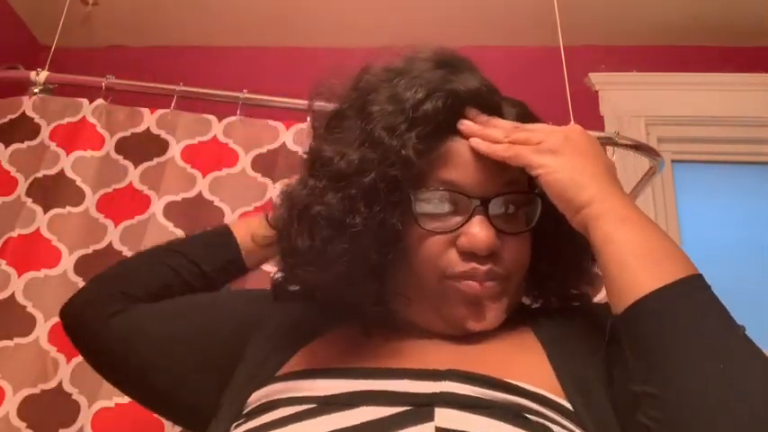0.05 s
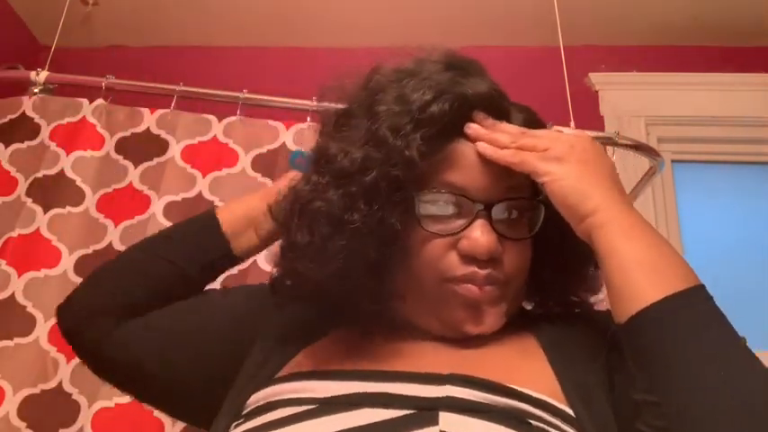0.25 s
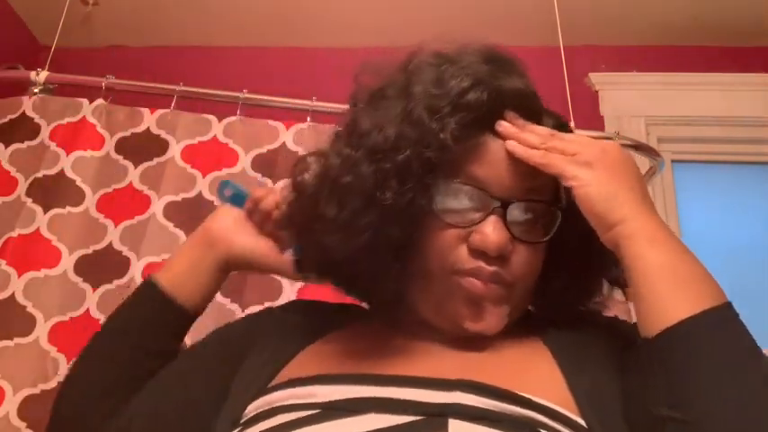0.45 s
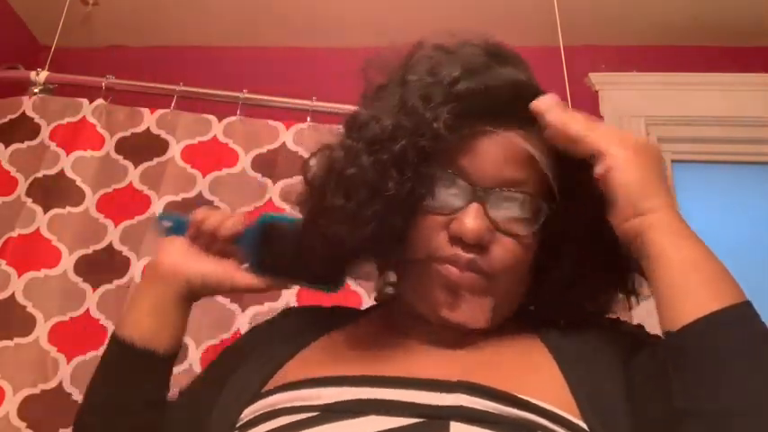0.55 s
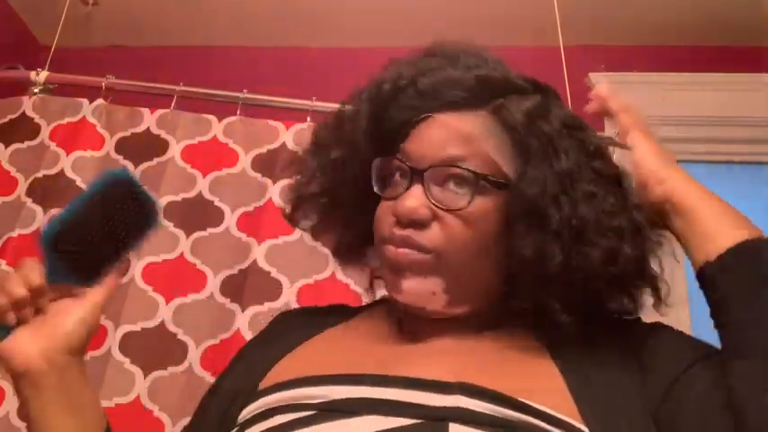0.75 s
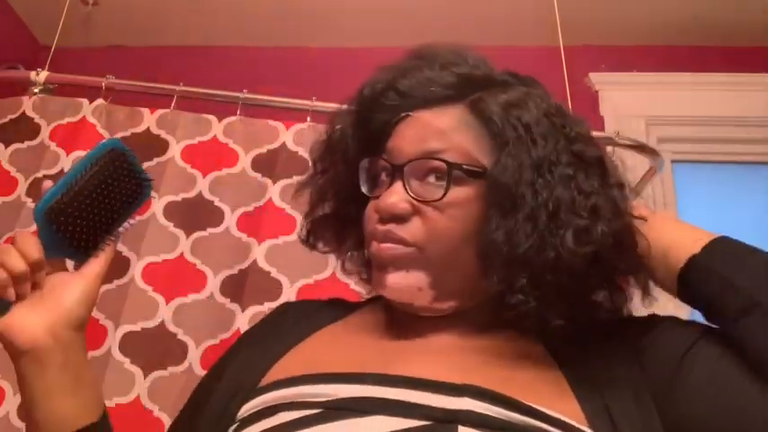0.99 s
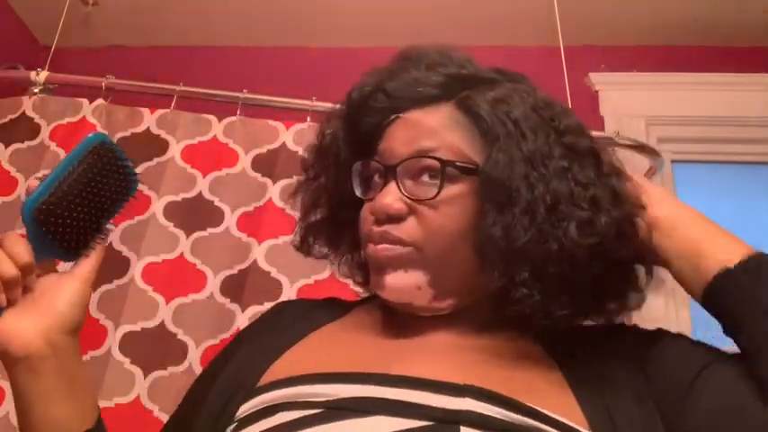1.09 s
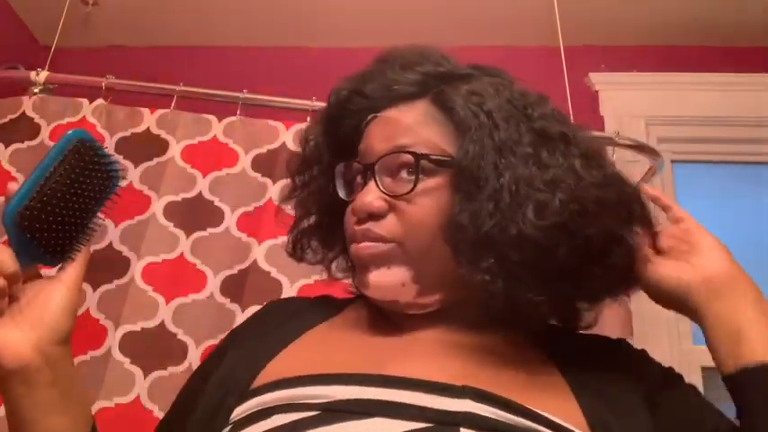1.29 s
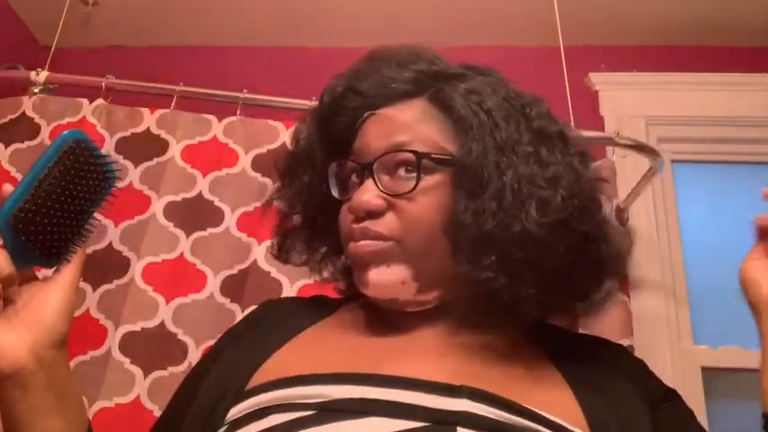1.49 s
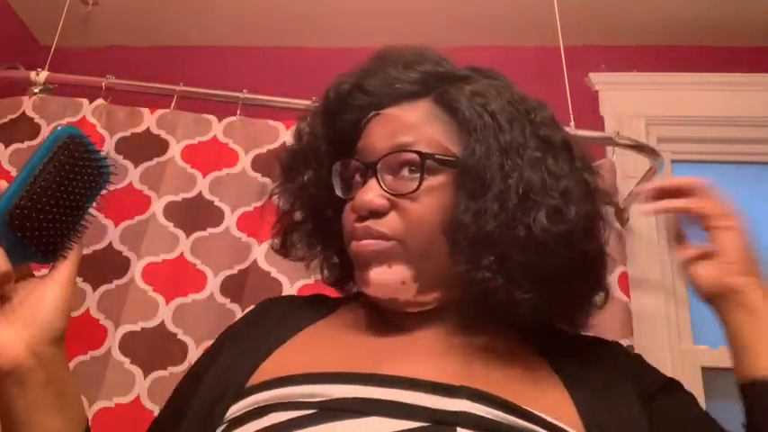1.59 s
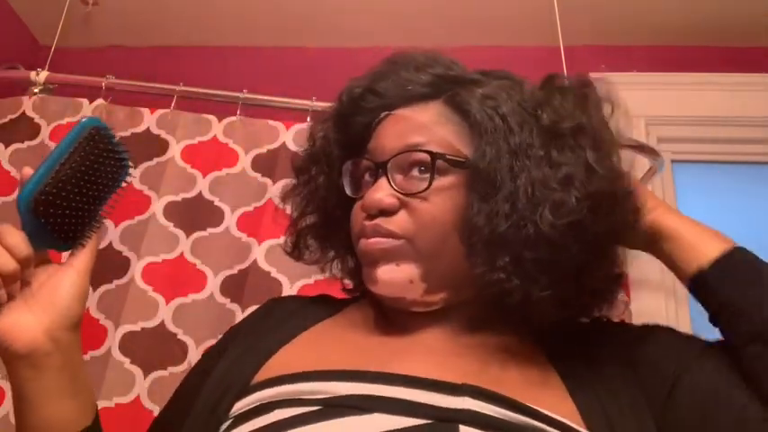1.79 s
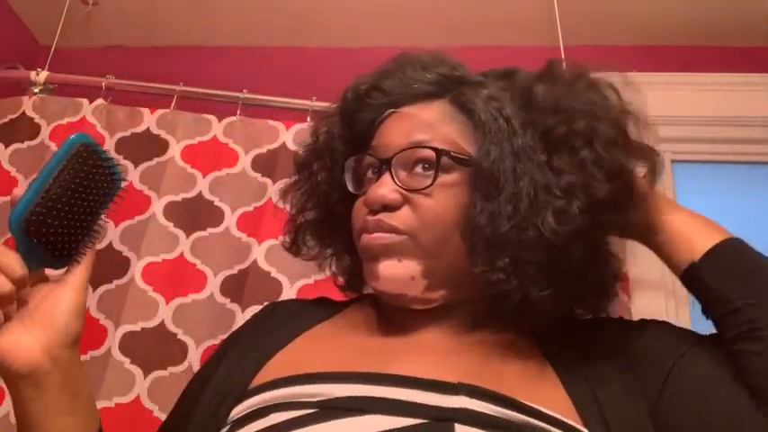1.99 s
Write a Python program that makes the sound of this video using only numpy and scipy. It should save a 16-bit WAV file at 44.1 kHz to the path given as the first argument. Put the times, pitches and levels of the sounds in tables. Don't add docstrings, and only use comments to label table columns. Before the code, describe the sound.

A paddle brush is pulled once through a curly wig, bristles scratching and its hollow cushion knocking, ending in a sharp click; then fingers faintly rustle the curls, close to a phone microphone in a small tiled bathroom.

```python
import sys
import numpy as np
from scipy import signal
from scipy.fft import rfft, irfft
from scipy.io import wavfile
from scipy.ndimage import uniform_filter1d

SR = 44100
rng = np.random.default_rng(int(sys.argv[2]) if len(sys.argv) > 2 else 0)


def dump_mix(stems):
    frames = np.atleast_2d(stems).T
    limited = np.clip(frames, -1, 1)
    pcm = np.round(limited * 32767).astype(np.int16)
    wavfile.write(sys.argv[1], SR, pcm)


def linear_from_db(decibels):
    return 10 ** (np.asarray(decibels, float) / 20)


N = 90404

# (time [s], cushion drag [dB], bristle scratch [dB], fibre slide [dB])
STROKE = [
    (0.11, -81.5, -91, -97),
    (0.18, -54, -61, -83),
    (0.286, -35, -41, -52),
    (0.36, -35.5, -38, -54.5),
    (0.386, -51, -46.5, -56),
    (0.5, -60, -67.5, -61.5),
    (0.564, -52.5, -67, -64),
    (0.604, -78, -91, -75.5),
    (0.66, -74, -94, -80),
]
# (time [s], level [dB])
TICKS = [
    (0.138, -58),
    (.167, -51),
    (0.2145, -46),
    (0.264, -43),
    (0.3531, -26.5),
]


def unit(x):
    return x / np.sqrt(np.mean(x ** 2))


def curve(rows, column):
    rows = np.array(rows)
    return np.interp(np.arange(N) / SR, rows[:, 0], rows[:, column])


def colour(x, points):
    hz = np.fft.rfftfreq(N, 1 / SR) + 1
    p = np.array(points)
    db = np.interp(np.log(hz), np.log(p[:, 0]), p[:, 1], left=-70, right=-70)
    return unit(irfft(rfft(x) * linear_from_db(db), N))


def ring(x, modes):
    out = 0
    for k, (hz, db, t60_s) in enumerate(modes):
        r = np.exp(-np.log(1000) / (t60_s * SR))
        w = 2 * np.pi * hz / SR
        mode = signal.lfilter([0, np.sin(w)], [1, -2 * r * np.cos(w), r * r], x)
        out = out + (-1) ** k * linear_from_db(db) * mode
    return out


def band(x, hz, width_hz):
    return unit(signal.lfilter(*signal.iirpeak(hz, hz / width_hz, SR), x))


def walk(rate_hz):
    k = int(SR / rate_hz)
    held = np.repeat(rng.standard_normal(N // k + 1), k)
    return unit(uniform_filter1d(uniform_filter1d(held, k), k)[:N])


def grains(rate_per_s, scatter_db):
    chance, sign, size = rng.random((N, 3)).T
    return unit((chance < rate_per_s / SR) * np.sign(sign - 0.5) * linear_from_db(-scatter_db * np.log(size + 1e-9)))


def hiss(points, rate_per_s, scatter_db, patchy_db):
    spec = rfft(colour(grains(rate_per_s, scatter_db), points))
    octave = np.log2(np.fft.rfftfreq(N, 1 / SR) + 1)
    out = 0
    for centre in np.arange(10, 14.6, 0.5):
        part = irfft(spec * np.clip(1 - 2 * abs(octave - centre), 0, 1), N)
        out = out + linear_from_db(patchy_db * walk(5.58)) * part
    return out


def house():
    # (frequency [Hz], density [dB per Hz])
    floor_spectrum = [(30, -17.5), (70, -4), (200, -12.5), (600, -20.5), (1050, -32), (7500, -43.5),
                      (14200, -48.5), (14900, -83)]
    # (frequency [Hz], width [Hz], level [dB])
    room_modes = [(99.4, 12.5, -72), (170.5, 25, -66), (341.4, 20, -78.5)]
    boom = 0
    for hz, width_hz, db in room_modes:
        mode = band(band(rng.standard_normal(N), hz, width_hz), hz, width_hz)
        boom = boom + linear_from_db(db + 1.56 * walk(5.8)) * mode
    return linear_from_db(-64.5 + 0.36 * walk(4.3)) * colour(rng.standard_normal(N), floor_spectrum) + boom


def hand():
    # (time [s], level [dB])
    finger_moves = [(0.78, -89), (0.984, -78.5), (0.998, -73.5), (1.206, -69), (1.266, -63), (1.368, -69.5),
                    (1.386, -72), (1.436, -97.5), (1.616, -95), (1.69, -71), (1.73, -69.5), (1.792, -85),
                    (1.806, -78), (1.866, -92), (1.934, -78), (1.97, -88), (2.04, -82), (2.05, -84)]
    # (frequency [Hz], density [dB per Hz])
    curl_spectrum = [(1060, -11), (1800, -14), (2160, -28), (2650, -7), (4550, -11), (4980, -4.5),
                     (7740, -1), (9270, -8), (15500, -4.5)]
    lock_slips = [(0.512, 0.048, -68, 12500, 4960), (1.008, .015, -81, 3100, 600),
                  (1.017, 0.038, -80, 9500, 1500), (.85, 0.013, -86, 13000, 3000),
                  (1.119, 0.013, -72.5, 4100, 2500), (1.21, 0.066, -76.5, 5040, 350),
                  (1.28, 0.033, -77, 7140, 1510), (1.35, 0.029, -73.5, 7300, 1200),
                  (1.715, 0.037, -74.5, 3200, 1700), (1.274, 0.047, -80.5, 3000, 900),
                  (1.93, .02, -84, 13600, 3000)]
    t = np.arange(N) / SR
    locks = 0
    for s, half_s, db, hz, width_hz in lock_slips:
        swell = np.exp(-0.5 * ((t - s) / half_s) ** 2)
        locks = locks + linear_from_db(db) * swell * band(grains(4000, 2.6), hz, width_hz)
    fade_in = np.clip((t - finger_moves[0][0]) / 0.052, 0, 1)
    level = fade_in * linear_from_db(curve(finger_moves, column=1) - 2.0)
    return level * hiss(curl_spectrum, 9000, 1.5, patchy_db=1.9) + locks


def fibres():
    # (frequency [Hz], density [dB per Hz])
    fibre_spectrum = [(1180, -42), (2000, -10), (2970, 0), (4550, -5.5), (6870, -2), (8290, -8),
                      (12000, -16.5), (15500, -13)]
    rush_db, rush_s, settle_db_per_s = -25.5, 0.017, 32
    t = np.arange(N) / SR
    rush = 0
    for s, db in TICKS:
        rush = rush + (t > s) * linear_from_db(db + rush_db) * np.exp(-np.maximum(t - s, 0) / rush_s)
    settling_db = settle_db_per_s * np.maximum(t - STROKE[-1][0], 0)
    slide = linear_from_db(curve(STROKE, column=3) - settling_db)
    return (slide + rush) * hiss(fibre_spectrum, 9000, 2.14, patchy_db=-0.86)


def ticks():
    # (frequency [Hz], level [dB], t60 [s])
    tip_modes = [(1410, 0, 0.004), (2870, -3.5, 0.0079), (4070, -12, 0.0027), (7900, -19, 0.0026),
                 (12400, -24, 0.0016)]
    x = np.zeros(N)
    for s, db in TICKS:
        x[int(s * SR)] = linear_from_db(db)
    return ring(x, tip_modes)


def brush():
    # (time [s], level [dB], brightness [0-1])
    snags = [(.139, -58, 0.14), (0.168, -42, 0.7), (.186, -39, 0.25), (.212, -38, 0.4),
             (0.241, -34.5, 0.77), (0.244, -33, 0.17), (.265, -32, 0.3), (.278, -34.5, .1),
             (.293, -26.5, 0.18), (0.306, -29, 0.34), (.328, -30.5, 0.17), (0.3527, -35, 0.86),
             (.559, -71, 0.2), (.936, -56.5, 0.12), (1.688, -66, .05)]
    # (frequency [Hz], level [dB], t60 [s])
    cushion_modes = [(202.7, -11, 0.11), (316, -9, 0.11), (372, -7.5, 0.078), (532.3, 0.5, 0.036),
                     (616.5, -3, 0.044), (669, -5.5, .08), (826, -7.5, 0.041), (899, -9, 0.053),
                     (961.7, -8, 0.055)]
    # (frequency [Hz], level [dB], t60 [s])
    bristle_modes = [(1200, -2, 0.021), (1486, -2.5, 0.015), (1710, -3, 0.013), (2440, -4, 0.0054),
                     (2940, -5, 0.0063), (3580, -7, .008), (4530, -6.5, 0.004), (5380, -11.5, 0.0066),
                     (6820, -12, 0.005)]
    snag_decay_s = 0.0048

    t = np.arange(N) / SR
    on = (t > STROKE[0][0]) * (t < STROKE[-1][0])
    drag = on * linear_from_db(curve(STROKE, column=1) + 0.5)
    scratch = on * linear_from_db(curve(STROKE, column=2) - 2)
    slips, scratches = grains(1500, 3), grains(6800, 3)
    low = ring(slips * drag, cushion_modes) / np.std(ring(slips, cushion_modes))
    high = ring(scratches * scratch, bristle_modes) / np.std(ring(scratches, bristle_modes))

    dull, bright = np.zeros(N), np.zeros(N)
    k = np.arange(int(0.015 * SR))
    for s, db, share in snags:
        burst = rng.standard_normal(len(k)) + 5.2 * (k < 4)
        burst = burst * np.exp(-k / (snag_decay_s * SR))
        burst = linear_from_db(db - 2.5) * burst / np.linalg.norm(burst)
        start = int(s * SR)
        dull[start:start + len(k)] += (1 - share) * burst
        bright[start:start + len(k)] += share * burst
    return low + high + ring(dull, cushion_modes) + ring(bright, bristle_modes[:3])


def tiled_room(near):
    t60_s, treble_t60_s = 0.28, 0.11
    t = np.arange(int(0.6 * SR)) / SR
    noise = rng.standard_normal(len(t))
    low = signal.lfilter(*signal.butter(2, 2000, fs=SR), noise)
    tail = low * linear_from_db(-60 * t / t60_s) + (noise - low) * linear_from_db(-60 * t / treble_t60_s)
    tail = tail * (t > 0.004)
    tail = tail / np.std(noise[:int(0.03 * SR)]) / np.sqrt(0.03 * SR)
    return signal.fftconvolve(near, tail)[:N]


def scene():
    near = hand() + fibres() + ticks() + brush()
    return (near + linear_from_db(-3) * tiled_room(near) + house())[None]


def low_pass(x):
    return signal.sosfilt(signal.butter(12, 15640, fs=SR, output="sos"), x)


def record(dry):
    return low_pass(dry)


dry = scene()
out = record(dry)
dump_mix(out)
```